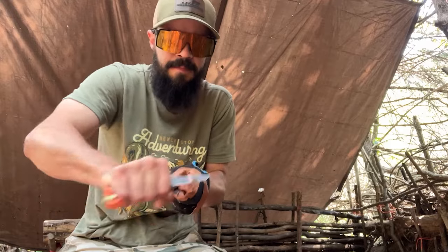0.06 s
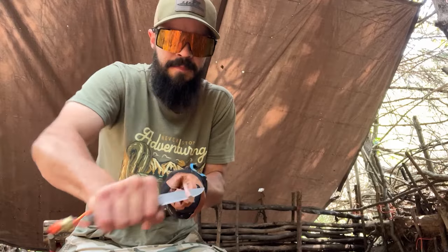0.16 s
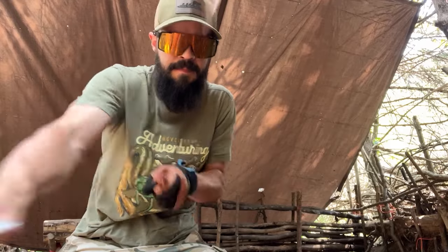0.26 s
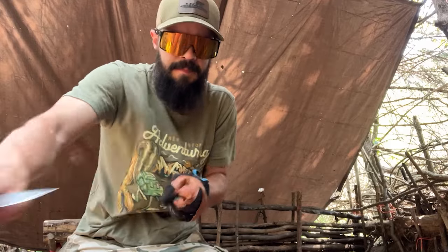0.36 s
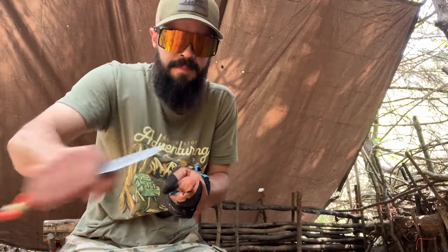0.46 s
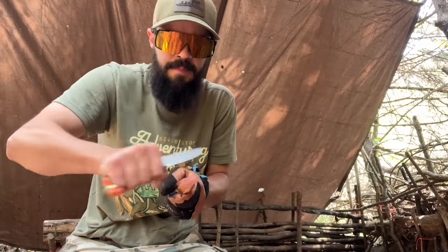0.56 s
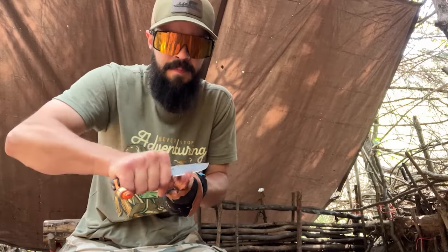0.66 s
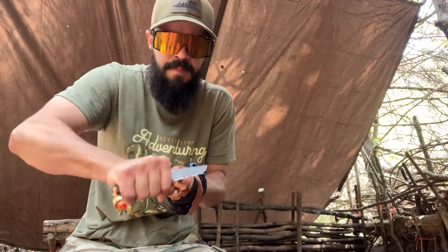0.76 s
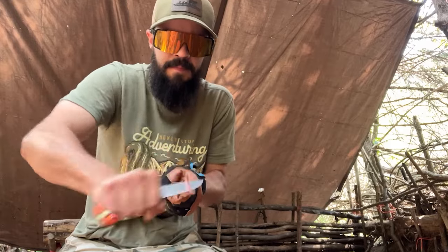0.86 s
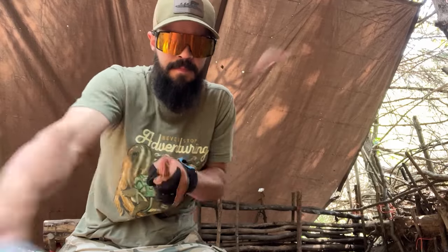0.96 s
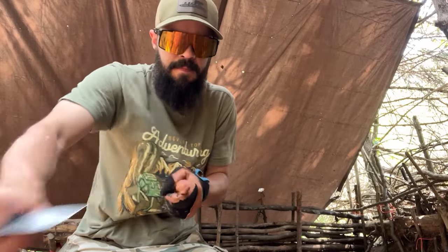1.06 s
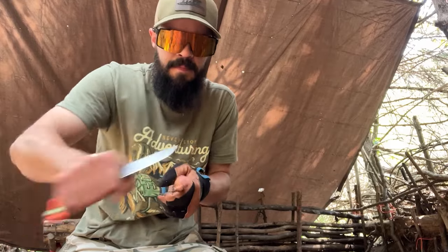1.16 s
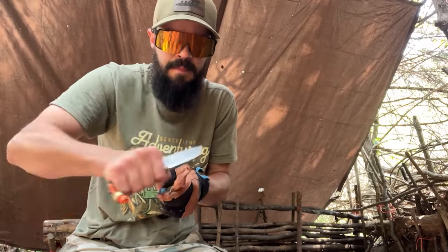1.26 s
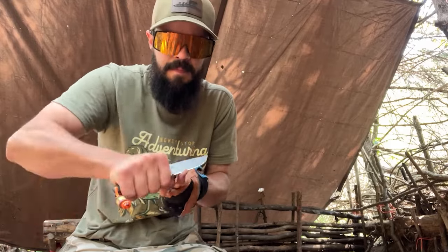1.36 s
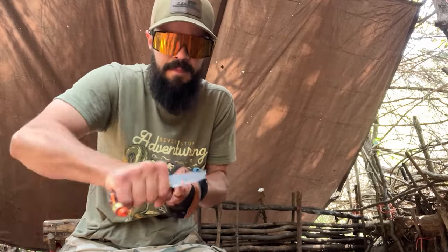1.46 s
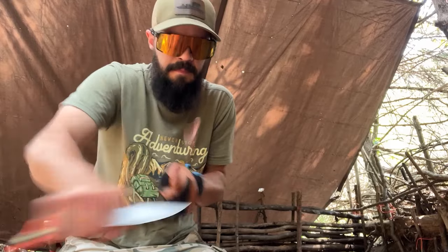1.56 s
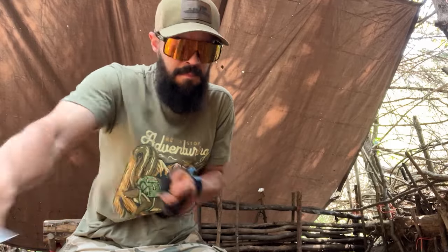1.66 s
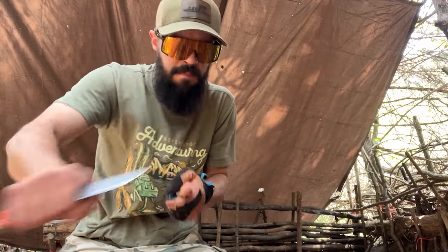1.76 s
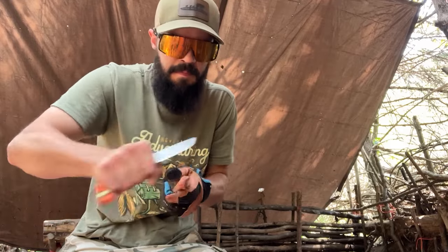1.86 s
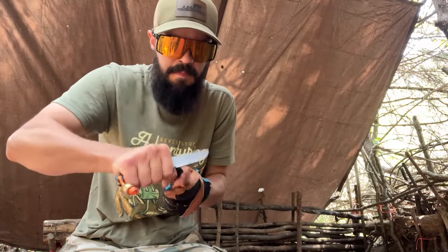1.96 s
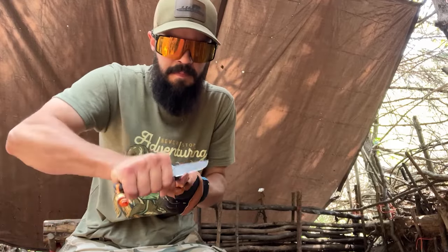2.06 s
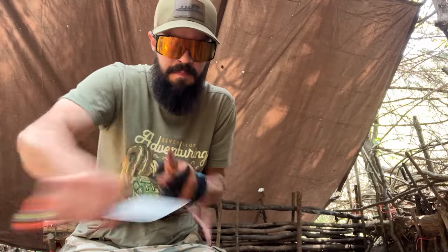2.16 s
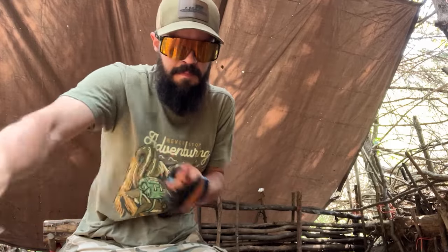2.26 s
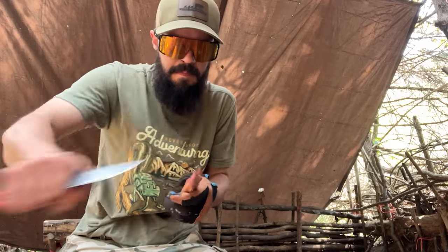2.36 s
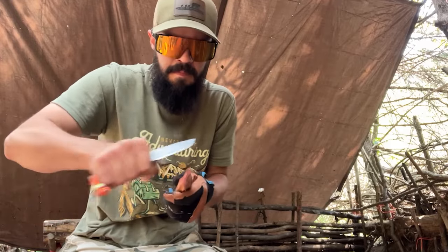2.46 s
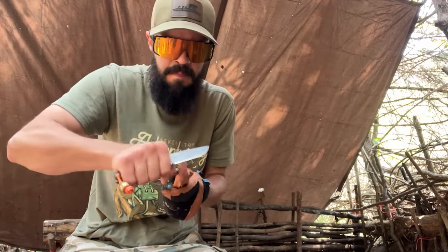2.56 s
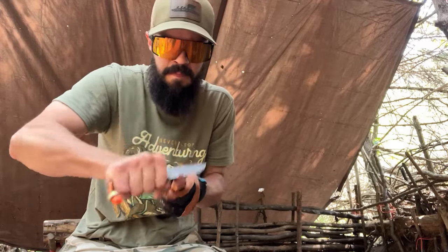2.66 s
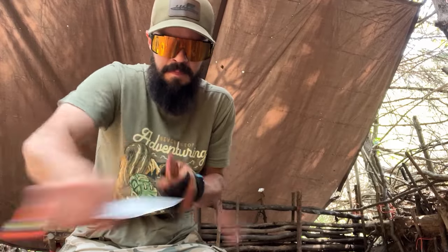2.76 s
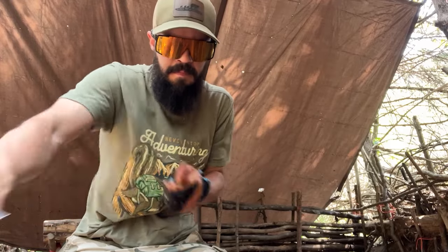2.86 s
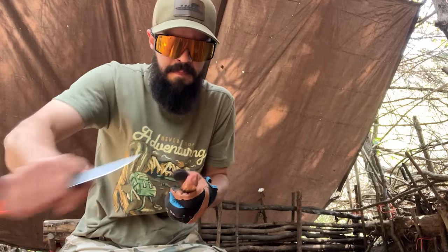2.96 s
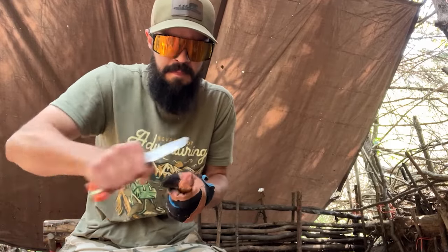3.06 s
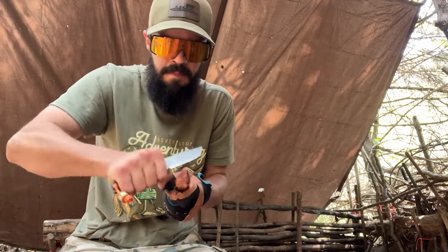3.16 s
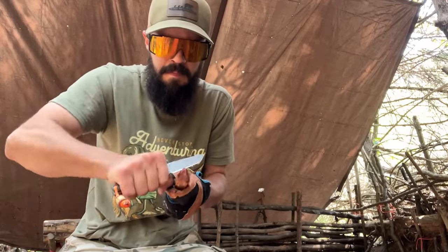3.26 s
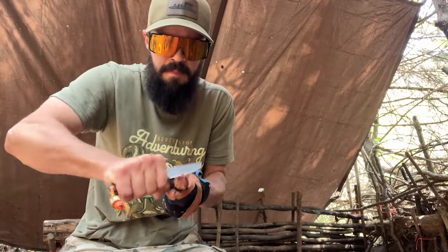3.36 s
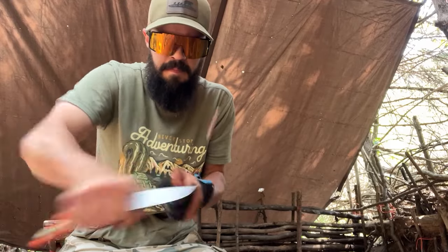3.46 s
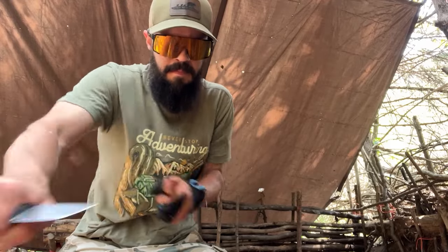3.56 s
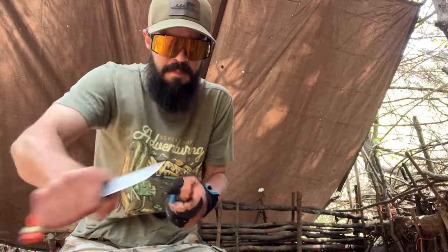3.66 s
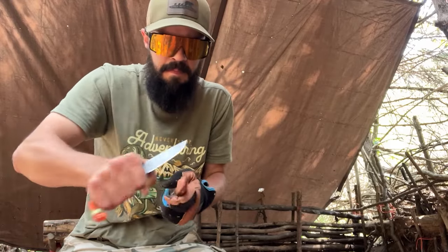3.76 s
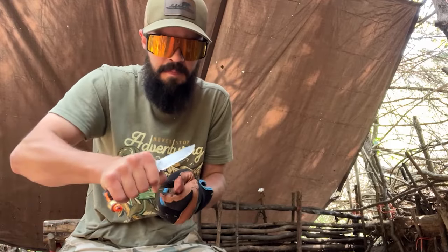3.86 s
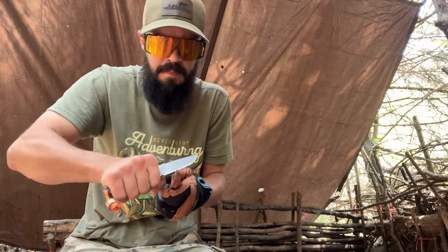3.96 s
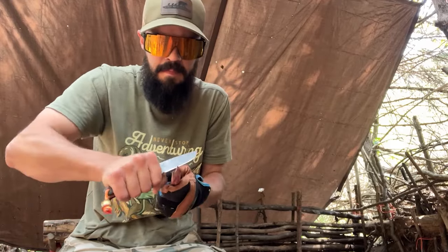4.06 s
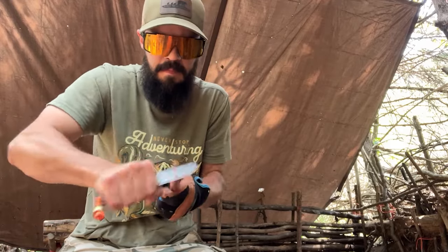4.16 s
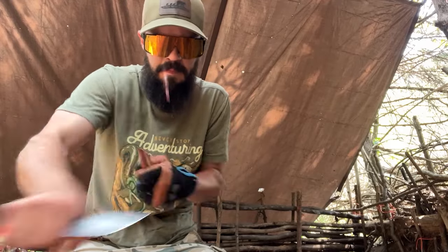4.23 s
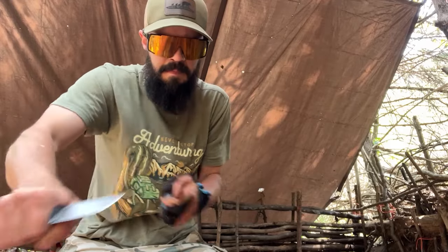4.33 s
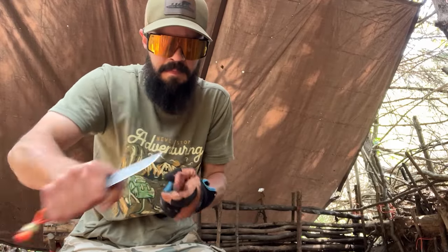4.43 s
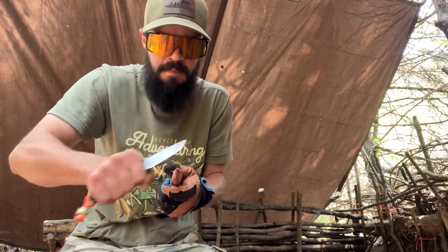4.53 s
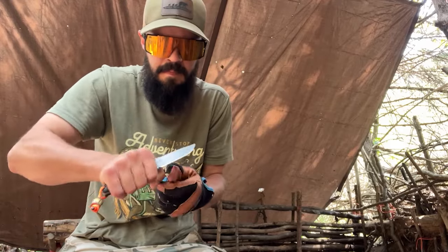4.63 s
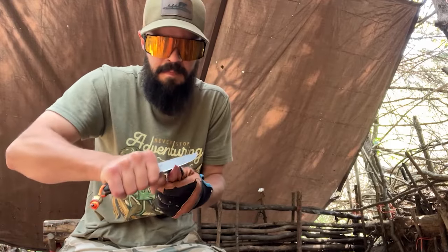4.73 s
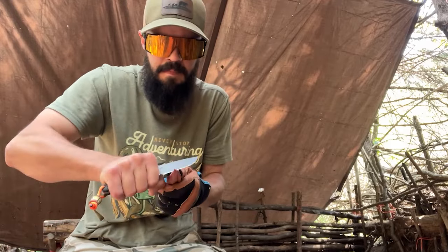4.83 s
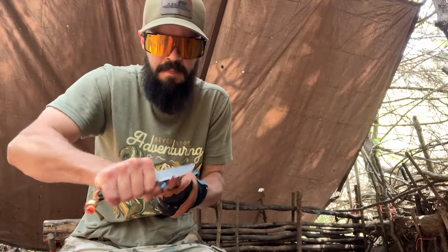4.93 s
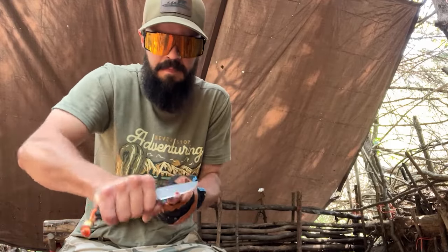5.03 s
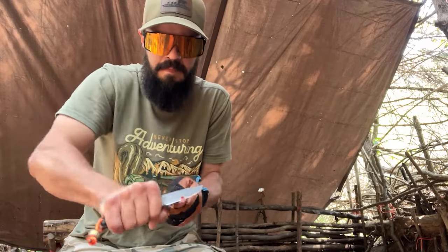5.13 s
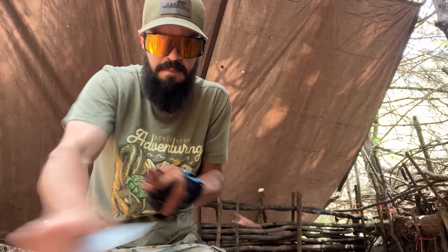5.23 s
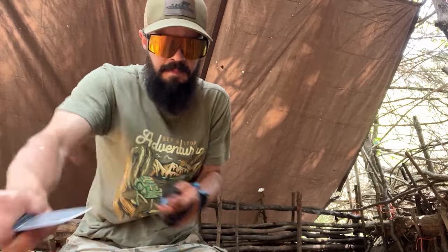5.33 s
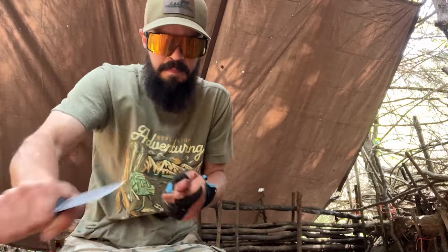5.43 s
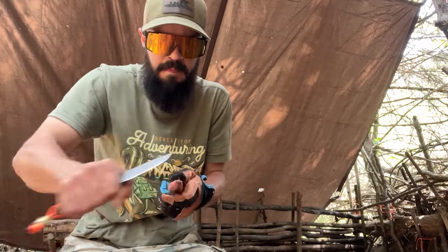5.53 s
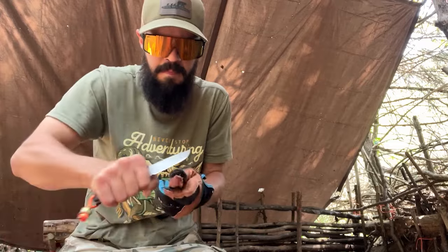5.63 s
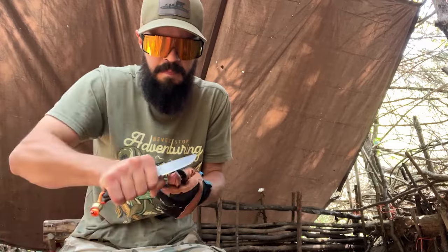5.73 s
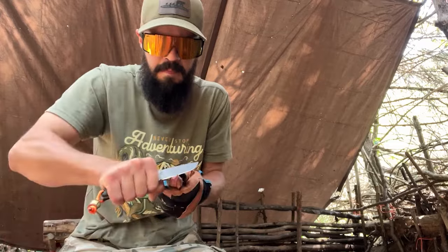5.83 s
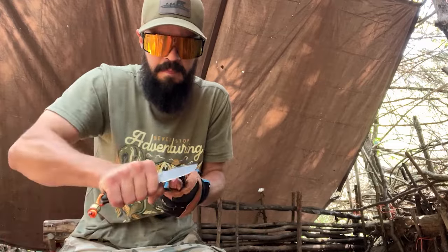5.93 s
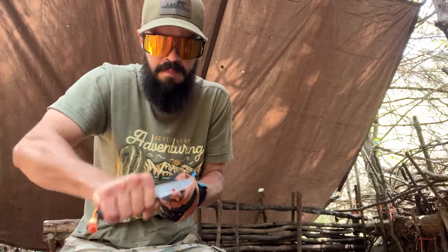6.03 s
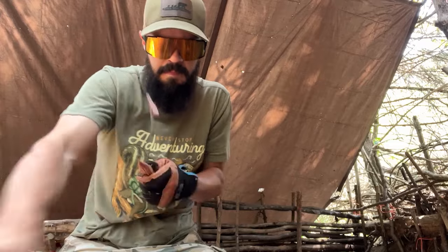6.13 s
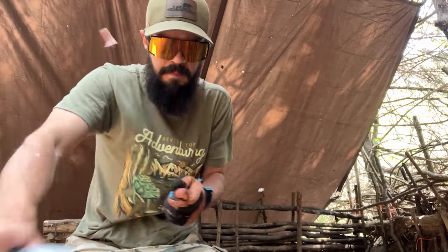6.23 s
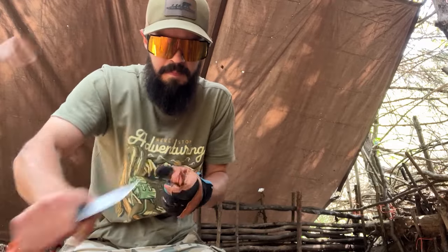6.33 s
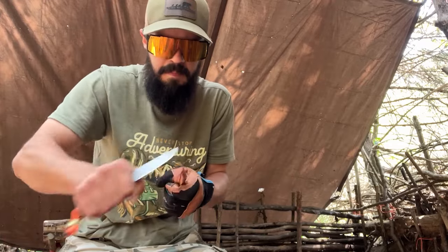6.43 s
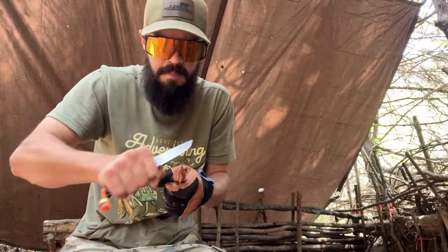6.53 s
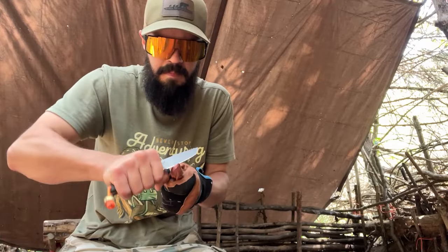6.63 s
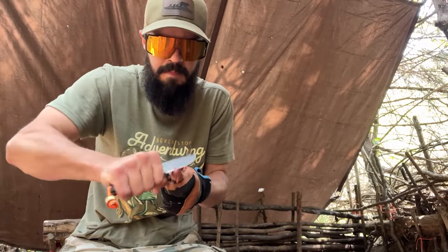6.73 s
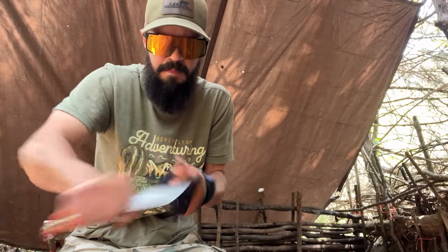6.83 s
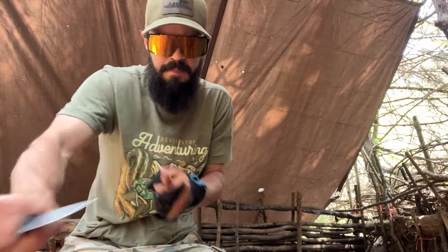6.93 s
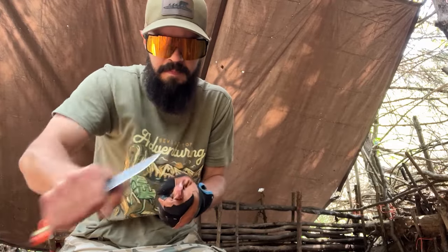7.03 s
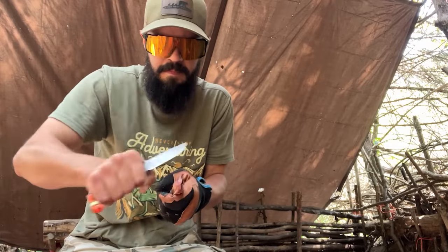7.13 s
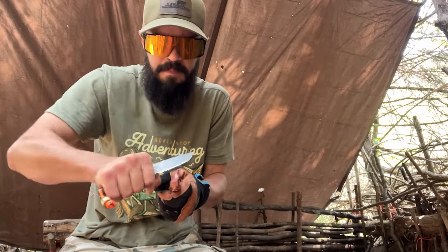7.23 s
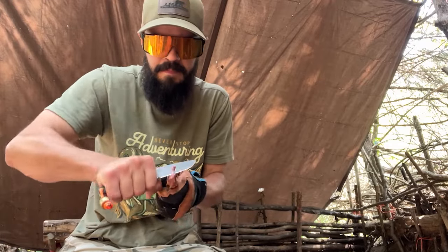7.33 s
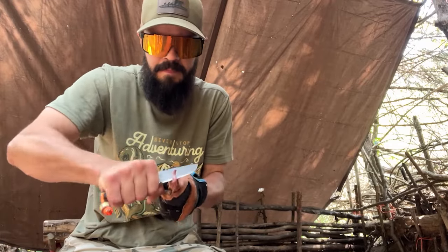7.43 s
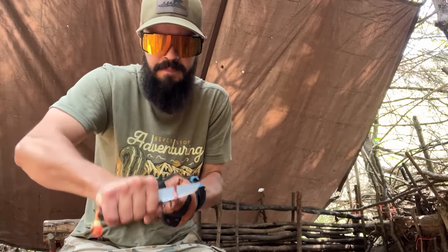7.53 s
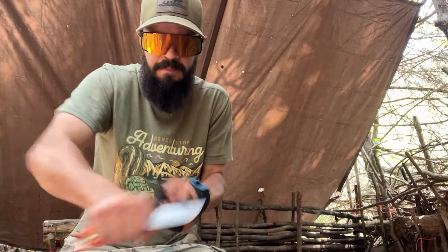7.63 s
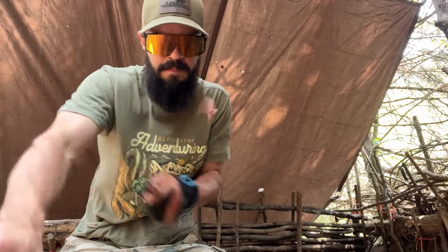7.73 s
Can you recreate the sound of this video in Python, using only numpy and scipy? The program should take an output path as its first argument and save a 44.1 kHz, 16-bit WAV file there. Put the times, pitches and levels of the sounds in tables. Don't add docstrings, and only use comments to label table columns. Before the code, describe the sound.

Twelve or so quick carving strokes on dry wood, heard very near. Each begins with a faint knock and small crackles, swells into a gritty, hissy scrape and ends abruptly in a woody snap; some are sharp and loud, others soft and scratchy. Soft cloth swishes follow as the arm swings out and returns. Stray hard ticks dot the gaps over a barely audible outdoor background.

```python
import sys
import numpy as np
from scipy import signal
from scipy.fft import rfft, irfft, next_fast_len
from scipy.io import wavfile
from scipy.ndimage import map_coordinates

SR = 44100
rng = np.random.default_rng(int(sys.argv[2]) if len(sys.argv) > 2 else 0)


def decibels_to_gain(level_db):
    exponent = np.asarray(level_db, float) / 20
    return 10 ** exponent


def store_wav(level_fs):
    pcm = np.round(np.clip(np.atleast_2d(level_fs), -1, 1) * 32767)
    wavfile.write(sys.argv[1], SR, pcm.T.astype(np.int16))


N = 343371


def rms_one(x):
    return x / np.sqrt(np.mean(x ** 2) + 1e-20)


def peak_one(x):
    return x / (np.abs(x).max() + 1e-20)


def add(out, start_s, sound):
    at = round(start_s * SR)
    out[at:at + len(sound)] += sound[:N - at]


def resonance(x, hz, width_hz):
    r = np.exp(-np.pi * width_hz / SR)
    zeros = np.array([1, 0, -1]) * (1 - r * r) / 2
    poles = [1, -2 * r * np.cos(2 * np.pi * hz / SR), r * r]
    return signal.lfilter(zeros, poles, x)


def body(x, peaks):
    out = 0
    for k, (hz, width_hz, db) in enumerate(peaks):
        out = out + (-1) ** k * decibels_to_gain(db) * resonance(x, hz, width_hz)
    return out


def band(x, low_hz, high_hz):
    return signal.sosfilt(signal.butter(2, [low_hz, high_hz], "band", fs=SR, output="sos"), x)


def drift(rate_hz):
    knots = rng.standard_normal(4000)
    return map_coordinates(knots, [np.arange(N) / SR * rate_hz * 2], order=1)


def crackle(shape, per_s, spread_db):
    sizes = decibels_to_gain(spread_db * np.minimum(rng.exponential(1, shape), 4)) * rng.choice([-1, 1], shape)
    return sizes * (rng.random(shape) < per_s / SR) + 1e-9


def coloured(spectrum, patchy_db):
    out, together = 0, drift(6.0)
    edges_hz = 22 * 2 ** np.arange(0, 9.9, .5)
    white = rng.standard_normal((2, N))
    hz_at, db_at = np.transpose(spectrum)
    for k, (low_hz, high_hz) in enumerate(zip(edges_hz, edges_hz[1:])):
        level_db = np.interp(np.log(low_hz * high_hz) / 2, np.log(hz_at), db_at, -60, db_at[-1])
        if level_db > -55:
            flicker_db = patchy_db * (1.2 * together + drift(11.0))
            out = out + decibels_to_gain(level_db + flicker_db) * band(white[k % 2], low_hz, high_hz)
    return rms_one(out)


# frequency in Hz, level in dB per Hz.
WOODS_SPECTRUM = [(15, -32), (30, -8), (80, -1.5), (130, -8), (370, -18), (700, -19.5), (1000, -27.5),
                  (2500, -45), (4000, -49.5), (5600, -33), (7000, -25), (12000, -24), (16000, -19)]


def woods():
    return decibels_to_gain(-68) * coloured(WOODS_SPECTRUM, patchy_db=-0.5)


def effort(t_s, start_s, top_s, *levels_db):
    build_up_db = (16.5, 26, 17.5)
    let_go_db_per_s = (331, 378, 326.5)
    lead_s = .025
    t = start_s - lead_s + np.arange(SR // 2) / SR
    short = np.clip((top_s - t) / (top_s - start_s), 0, None)
    below_db = np.outer(build_up_db, short) + np.outer(let_go_db_per_s, np.maximum(t - top_s, 0))
    fade_in = np.clip(1 - (start_s - t) / lead_s, 0, 1)
    shape = decibels_to_gain(np.array(levels_db)[:, None] - below_db) * fade_in
    return [np.interp(t_s, t, row, 0, 0) for row in shape]


# frequency in Hz, width in Hz, level in dB.
WOOD_GRAIN = [(1100, 470, 2), (1700, 450, 4), (2480, 820, -1.5), (3174, 160, 6), (4194, 1200, -4)]
# frequency in Hz, width in Hz, level in dB.
BLADE_EDGE = [(5200, 1900, -7.5), (6800, 280, -1), (7380, 1600, -3), (10200, 920, 2), (10500, 1400, 0.5),
              (13940, 2500, -4)]
# start in seconds, full effort in seconds, woody rasp in dB,
# fine hiss in dB, push in the hands in dB.
PLOUGH_STROKES = [(0.0, 0.087, -55, -46, -48), (0.204, 0.195, -82, -34, -47.5),
                  (0.744, 0.911, -55.5, -45, -50), (1.439, 1.59, -55, -39.5, -52),
                  (2.088, 2.173, -67, -39.5, -53.5), (2.63, 2.757, -58, -47, -60.5),
                  (3.356, 3.479, -67, -51.5, -58.5), (4.149, 4.197, -48, -44, -52),
                  (4.923, 4.981, -55.5, -49.5, -56.5), (5.202, 5.219, -55, -55, -54),
                  (5.997, 6.068, -51.5, -51, -47), (6.724, 6.817, -48.5, -46, -46),
                  (7.387, 7.504, -57, -53, -53), (7.649, 7.649, -53, -70, -52)]


def strokes():
    t = np.arange(N) / SR
    rasp, hiss, push = sum(np.array(effort(t, *row)) for row in PLOUGH_STROKES)
    fibres = crackle(N, per_s=5000, spread_db=4) * decibels_to_gain(2.5 * drift(90.0))
    shake = band(rng.standard_normal(N) * decibels_to_gain(4 * drift(40.0)), 75, 430)
    cut = rasp * rms_one(body(fibres, WOOD_GRAIN)) + hiss * rms_one(body(fibres, BLADE_EDGE))
    return cut + push * rms_one(shake)


# time in seconds, level in dB.
SLOW_RUB = [(0.0, -82), (0.89, -57.5), (1.0, -64), (1.28, -78), (2.21, -61), (2.39, -80.5), (2.67, -78.5),
            (2.82, -63), (3.75, -77), (4.12, -67), (4.77, -79.5), (5.23, -74), (6.61, -77), (6.81, -71.5),
            (7.03, -90), (7.35, -85.5), (7.57, -77.5), (7.79, -70.5)]
# time at the height in seconds, cloth body in dB, cloth hiss in dB,
# half length in seconds.
ARM_SWISHES = [(0.301, -51, -58.5, 0.029), (0.472, -57, -62, 0.061), (1.138, -61.5, -55, 0.013),
               (1.242, -56, -59, 0.018), (1.792, -61.5, -63, 0.014), (2.389, -57.5, -50, 0.025),
               (2.867, -51, -57.5, 0.031), (3.057, -63.5, -58.5, 0.038), (3.736, -60, -58, 0.11),
               (4.667, -61, -56.5, 0.075), (5.31, -53, -55.5, 0.027), (5.471, -58, -57.5, 0.044),
               (5.722, -65.5, -58.5, 0.081), (6.246, -61, -57, 0.028), (6.996, -74.5, -62, 0.04),
               (7.734, -51.5, -53.5, 0.026)]
# time at the height in seconds, level in dB, half length in seconds.
FOLD_RUBS = [
    (.62, -68.5, .2),
    (3.102, -60, 0.33),
    (5.1, -66.5, 0.0956),
]
# frequency in Hz, width in Hz, level in dB.
FOLD_HOLLOW = [(1230, 160, 3)]
# frequency in Hz, level in dB per Hz.
BODY_SPECTRUM = [(250, -13), (500, -2), (1200, -2), (2000, -2), (3500, 0), (5000, -6.5), (6500, -19)]
# frequency in Hz, level in dB per Hz.
HISS_SPECTRUM = [(3000, -39.5), (4500, -9), (6000, -1.5), (9000, -7.5), (12000, -1), (16000, 0.5)]


def sleeve():
    t = np.arange(N) / SR
    swish_body, swish_hiss, fold = 0, 0, 0
    for s, body_db, hiss_db, half_s in ARM_SWISHES:
        bell = np.exp(-((t - s) / half_s) ** 2)
        swish_body = swish_body + decibels_to_gain(body_db) * bell
        swish_hiss = swish_hiss + decibels_to_gain(hiss_db) * bell
    for s, db, half_s in FOLD_RUBS:
        fold = fold + decibels_to_gain(db) * np.exp(-((t - s) / half_s) ** 4)
    rub_db = np.interp(t, *np.transpose(SLOW_RUB))
    rub_body = decibels_to_gain(rub_db - 1)
    rub_hiss = decibels_to_gain(-64 + 0.29 * (rub_db - rub_db.mean()))
    cloth = coloured(BODY_SPECTRUM, patchy_db=-3.5)
    low = np.hypot(rub_body, swish_body) * cloth + (.5 * rub_body + fold) * body(cloth, FOLD_HOLLOW)
    return low + np.hypot(rub_hiss, swish_hiss) * coloured(HISS_SPECTRUM, patchy_db=1.5)


def breaks(rows, rise, tail, width_hz, grainy, trim_db, thud_db, first, length_s=None):
    out, t = np.zeros(N), np.arange(4000) / SR
    fibres = crackle((len(rows), 4000), per_s=8000, spread_db=3.3)
    grips = rng.normal(1, .08, len(rows))
    for (s, db, hz, bright_db, *own_length_s), clicks, grip in zip(rows, fibres, grips):
        u = t / max(length_s or own_length_s[0], 5e-4)
        burst = clicks * (1 - np.exp(-u / rise)) * (np.exp(-u ** 3) + tail * np.exp(-t / .013))
        burst = burst + first * np.abs(burst).max() * (np.abs(u - 2 * rise) < u[1])
        jerk = burst * (np.exp(-u ** 3) + .3)
        grain = np.multiply(WOOD_GRAIN, [grip, 1, 1])
        edge = np.multiply(BLADE_EDGE, [grip, 1, 1])
        stutter = [(2 * hz, 1.2 * width_hz, 0), (3 * hz, 2 * width_hz, -3)]
        wood = peak_one(resonance(resonance(jerk, hz, width_hz), hz, 3 * width_hz))
        wood = wood + 0.14 * peak_one(body(jerk, stutter))
        wood = wood + grainy * peak_one(body(burst, grain))
        wood = wood + .55 * peak_one(band(burst, 2200, 6500))
        crack = decibels_to_gain(bright_db + 7.5) * peak_one(body(burst, edge))
        jolt = band(burst * np.exp(-t / .008), 150, 520)
        thud = decibels_to_gain(thud_db - .55 * (db + 30.5)) * peak_one(jolt)
        add(out, s, decibels_to_gain(db + trim_db) * (peak_one(wood) + crack + thud))
    return out


# start in seconds, peak in dB, ringing in Hz, bright crackle in dB re peak.
EDGE_NIBBLES = [(0.028, -41, 1460, -13), (0.048, -40.5, 1090, -20), (0.059, -36, 5200, -7),
                (0.182, -41.5, 880, -14), (0.192, -41, 3300, 1), (0.767, -51, 4500, 7),
                (0.776, -51, 1800, 2), (0.79, -41, 4000, -10), (0.869, -44, 980, 6),
                (1.458, -42, 1900, -25), (1.536, -45, 3740, -5.5), (2.738, -35.5, 2350, -6),
                (3.382, -52, 1900, -3), (3.404, -38, 1890, -14.5), (3.423, -33.5, 1840, -11.5),
                (4.211, -34.5, 1750, -22), (5.972, -44.5, 1970, -14), (5.985, -42, 1540, -17),
                (6.746, -37.5, 950, -19.5), (7.407, -43.5, 1530, -28), (7.417, -37, 1570, -25)]


def nibbles():
    return breaks(EDGE_NIBBLES, rise=0.061, tail=.05, width_hz=400, grainy=0.61, trim_db=-1.5,
                  thud_db=-16.5, first=0.41, length_s=0.0062)


# start in seconds, peak in dB, ringing in Hz, bright crackle in dB re peak,
# length in seconds.
EDGE_SLIPS = [(0.09, -37, 1690, -1, 0.01), (0.205, -21.5, 1670, -3, 0.015), (0.802, -34, 1090, -2, 0.017),
              (0.84, -27, 1100, -1, 0.0072), (0.923, -19, 3030, -20.5, 0.0087),
              (1.479, -32.5, 1500, -3, 0.019), (1.507, -35, 4680, -4, 0.027),
              (2.123, -31.5, 1724, -5, 0.017), (3.392, -34, 1860, -15.5, .013),
              (4.187, -18.5, 4230, -8.5, 0.011), (4.199, -18, 2430, -11, 0.0074),
              (4.956, -32, 1720, -16, 0.013), (5.21, -25, 2280, -3, 0.014), (5.996, -31.5, 2100, -13, 0.01),
              (6.025, -26.5, 1480, -16, 0.013), (6.053, -24.5, 2290, -22, .01),
              (6.755, -30.5, 4320, -26, 0.014), (6.808, -28.5, 3350, -10, 0.01),
              (7.433, -28.5, 2104, -10, 0.021), (7.444, -13.5, 2170, -45, 0.015),
              (7.478, -17.5, 1660, -18, 0.0094), (7.496, -20.5, 2200, -13.5, 0.014),
              (7.631, -25, 1720, -8, 0.015)]


def slips():
    return breaks(EDGE_SLIPS, rise=0.073, tail=0.04, width_hz=204, grainy=1.85, trim_db=-4,
                  thud_db=-10, first=1.0)


# start in seconds, peak in dB, ringing in Hz, bright crackle in dB re peak.
CURL_SNAPS = [(0.205, -18.5, 4830, -3.5), (0.219, -9.5, 1725, -18), (0.914, -42, 5030, -9),
              (0.93, -8, 2820, -7), (1.583, -5, 2764, -2.5), (2.175, -21.5, 1780, 4),
              (2.676, -44.5, 1750, 1), (2.7, -66, 4800, 14), (2.762, -21.5, 1520, -5),
              (2.768, -27, 800, -28), (3.473, -16, 2250, -21), (4.15, -30, 4330, -14),
              (4.171, -28.5, 4190, -11), (4.933, -35.5, 1805, -16), (4.981, -37, 1800, -2.5),
              (5.229, -39, 2240, -27.5), (6.075, -19, 2107, -10.5), (6.086, -26, 2480, -17),
              (6.791, -28, 2010, -11), (6.84, -30, 1930, -9), (7.474, -20.5, 2380, -5.5),
              (7.502, -36, 1900, -25), (7.648, -25, 2240, -23)]


def snaps():
    return breaks(CURL_SNAPS, rise=.15, tail=0.12, width_hz=320, grainy=0.75, trim_db=-3,
                  thud_db=-13.5, first=0.3, length_s=.0034)


# start in seconds, peak in dB, low mode in Hz, high mode in Hz,
# high mode in dB re peak.
BLADE_TAPS = [(0.695, -42, 1060, 1820, 0), (1.348, -40.5, 882, 1580, -10), (2.04, -41, 810, 2330, -3.5),
              (2.644, -44.5, 730, 1630, -5), (3.236, -48, 600, 1720, 0.5), (4.003, -45, 840, 2470, -15),
              (4.769, -59.5, 825, 2670, 4.5), (5.791, -51.5, 770, 2470, -11), (6.622, -43.5, 810, 2520, -5),
              (7.314, -45.5, 820, 2580, 2.5), (7.545, -55.5, 1010, 1960, 5)]


def taps():
    out, t = np.zeros(N), np.arange(3000) / SR
    width_hz = 190
    noises = rng.standard_normal((len(BLADE_TAPS), 3000))
    for (s, db, low_hz, high_hz, high_db), noise in zip(BLADE_TAPS, noises):
        knock = np.exp(-((t - .0008) / .00015) ** 2)
        knock = knock + 900 * t * noise * np.exp(-t / .0013)
        knock = knock + .03 * noise * np.exp(-t / .007)
        palm = 0.14 * peak_one(resonance(knock, 510, 80))
        low = peak_one(resonance(knock, low_hz, width_hz)) + palm
        high = peak_one(resonance(knock, high_hz, width_hz)) + 1.16 * peak_one(body(knock, WOOD_GRAIN))
        tick = peak_one(band(noise * np.exp(-t / 0.0011), 3440, 5160))
        add(out, s, decibels_to_gain(db + 4.5) * (low + decibels_to_gain(high_db + 3.5) * high + decibels_to_gain(high_db - 6) * tick))
    return out


# start in seconds, peak in dB, ringing in Hz, bright crackle in dB re peak,
# length in seconds.
CURL_TEARS = [
    (0.885, -22.5, 3580, 3, 0.042),
    (1.552, -17.5, 2740, -2, 0.035),
    (2.134, -20, 1700, 5.5, 0.039),
    (2.148, -14, 1730, -6, 0.029),
    (2.742, -28.5, 1560, 6.5, 0.024),
    (3.449, -20.5, 2180, -3.5, 0.036),
    (4.935, -40, 1880, -14, 0.019),
    (6.066, -6.5, 2330, -10.5, 0.02),
    (6.762, -26.5, 2150, -10, 0.052),
    (6.813, -30, 2150, 2.5, 0.016),
]


def tears():
    return breaks(CURL_TEARS, rise=0.8, tail=0.0178, width_hz=690, grainy=1.0, trim_db=-14.5,
                  thud_db=-16, first=0)


# start in seconds, peak in dB, ringing in Hz, bright crackle in dB re peak.
HARD_TICKS = [(1.438, -56, 1800, 5), (2.312, -40, 1860, 6), (1.576, -34.5, 4800, 11.5),
              (2.943, -45, 3180, 5), (3.362, -35, 4040, -26), (4.271, -44.5, 4600, 0.5),
              (4.554, -29, 3230, -11.5), (4.724, -38.5, 2700, -11), (5.397, -46.5, 3180, 6.5),
              (6.328, -56, 3100, -19), (6.358, -53, 4500, -1), (6.579, -48.5, 2750, -14),
              (6.664, -43, 3820, -11.5), (7.567, -37.5, 4830, -8)]


def ticks():
    return breaks(HARD_TICKS, rise=0.13, tail=0.058, width_hz=3500, grainy=1.0, trim_db=-2.0,
                  thud_db=-29, first=0.044, length_s=0.0026)


def tarp(x):
    t60_s, level_db, gap_s = 0.056, -16.5, .004
    t = np.arange(8000) / SR
    echoes = band(rng.standard_normal(8000), 360, 4200) * decibels_to_gain(-60 * t / t60_s) * (t > gap_s)
    return decibels_to_gain(level_db) * signal.fftconvolve(x, echoes / np.linalg.norm(echoes))[:N]


# frequency in Hz, right lead in radians, likeness of near sounds (0-1),
# likeness of far sounds (0-1), left minus right in dB.
MIC_PORTS = [(100, .1, .9, .85, .6), (350, .3, .88, .45, -1.5), (1000, .15, .92, .2, .5),
             (2500, 0, .83, .4, -1.2), (3800, .3, .62, .65, -2.4), (5400, 1.4, .45, .3, -4.5),
             (7200, 1.6, .8, .75, -2.5), (8600, .9, .97, .95, -.4), (9200, .03, 1, 1, 0),
             (10600, -.03, 1, 1, 0), (11400, -1, 1, 1, 0), (12700, -2.3, 1, 1, 0), (13200, -3.12, 1, 1, 0),
             (14950, -3.16, 1, 1, 0), (15600, -4.5, 1, 1, 0)]


def ports(x, alike, smear_s, wander_hz):
    size = next_fast_len(N + SR // 4)
    hz, table = np.arange(size // 2 + 1) * SR / size, np.transpose(MIC_PORTS)
    lead, like, tilt_db = (np.interp(hz, table[0], c) for c in (table[1], alike, table[4]))
    t = np.arange(SR // 4) / SR
    scatter = rfft(rng.standard_normal(SR // 4) * np.exp(-t / smear_s), size)
    moving = np.real(signal.hilbert(x, size)[:N] * np.exp(2.5j * drift(wander_hz)))
    other = rfft(moving, size) * scatter / np.abs(scatter)
    sign = np.array([[1], [-1]])
    pair = np.sqrt((1 + like) / 2) * rfft(x, size) + sign * np.sqrt((1 - like) / 2) * other
    return irfft(pair * decibels_to_gain(sign * tilt_db / 2) * np.exp(-.5j * sign * lead), size)[:, :N]


def scene():
    around = woods() + sleeve()
    knife = strokes() + nibbles() + slips() + snaps() + taps() + tears() + ticks()
    near, far = np.transpose(MIC_PORTS)[2:4]
    close = ports(knife + tarp(knife), near, smear_s=0.0014, wander_hz=25.0)
    return close + ports(around, far, smear_s=0.018, wander_hz=3.6)


def roll_off(x):
    return signal.sosfilt(signal.butter(12, 17000, fs=SR, output="sos"), x)


def record(dry):
    low_pass = signal.cheby2(16, 80, 16600, fs=SR, output="sos")
    mix = signal.sosfilt(low_pass, dry)
    return roll_off(mix)


dry = scene()
out = record(dry)
store_wav(out)
```